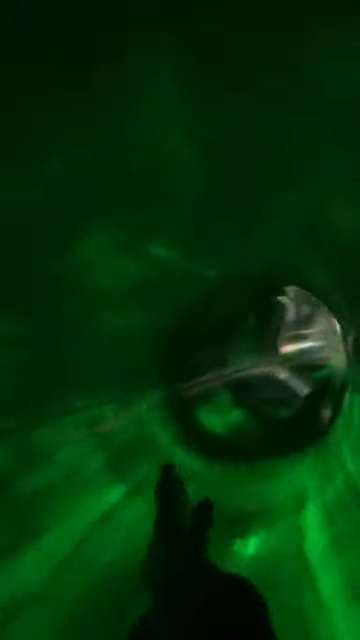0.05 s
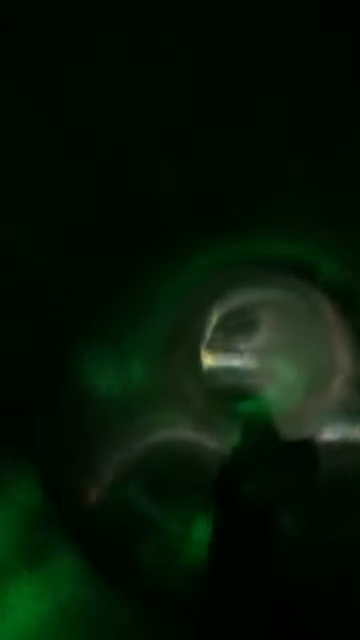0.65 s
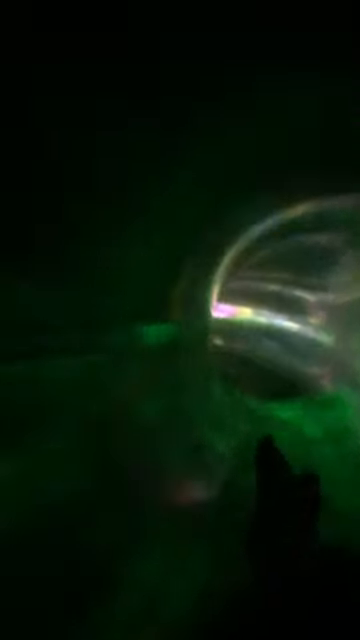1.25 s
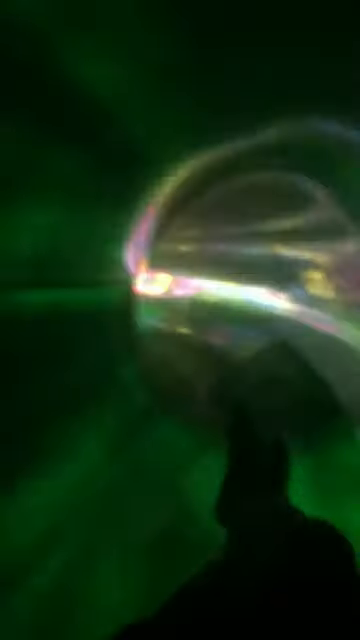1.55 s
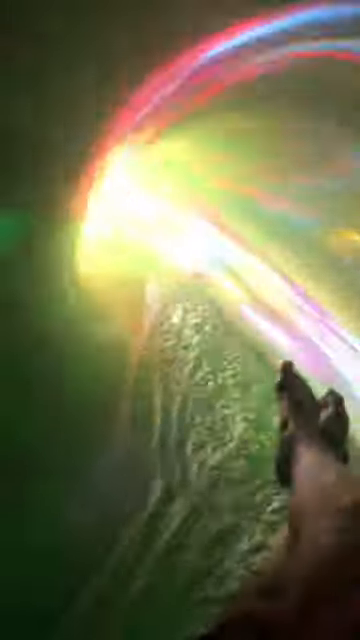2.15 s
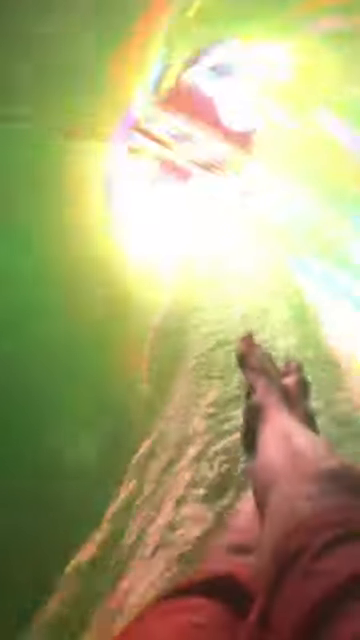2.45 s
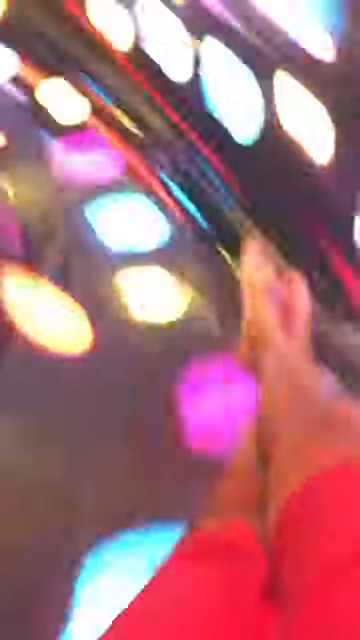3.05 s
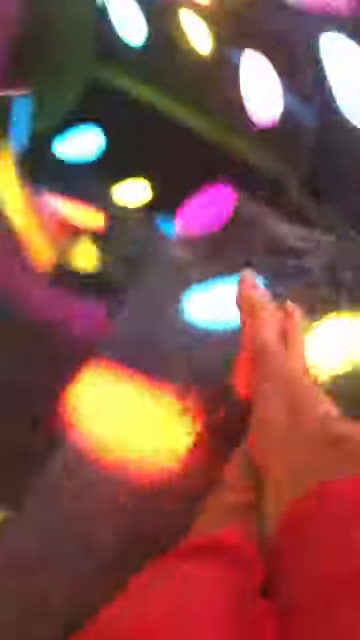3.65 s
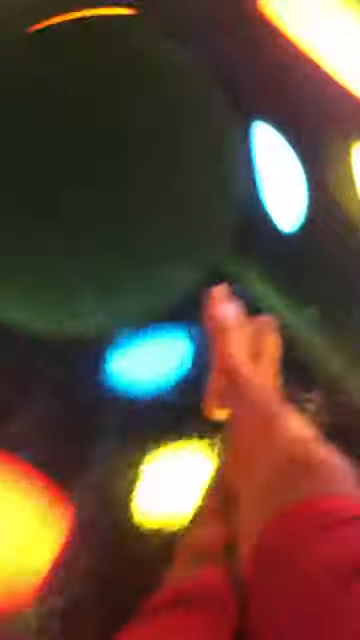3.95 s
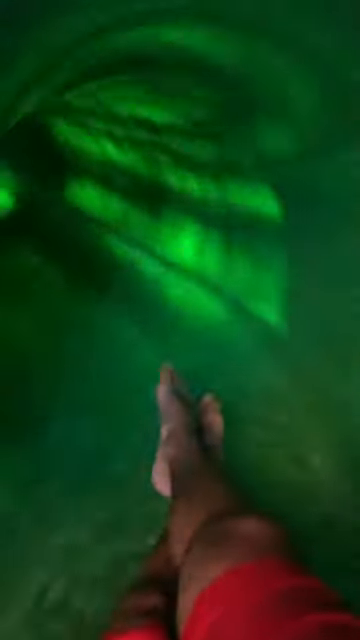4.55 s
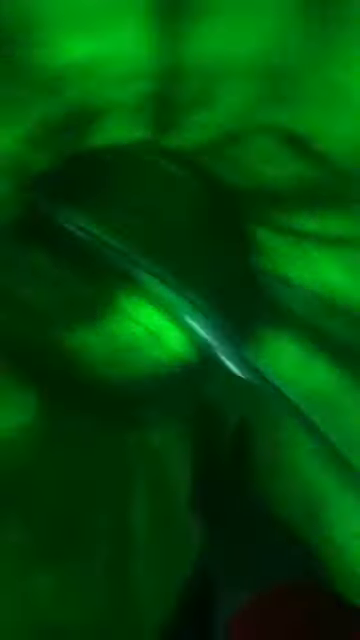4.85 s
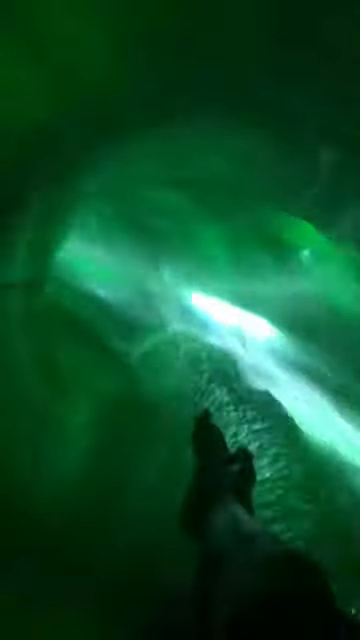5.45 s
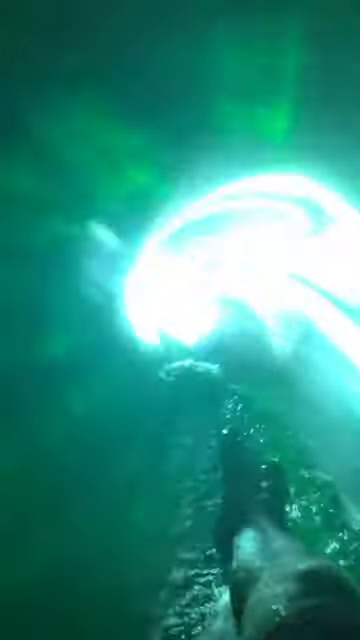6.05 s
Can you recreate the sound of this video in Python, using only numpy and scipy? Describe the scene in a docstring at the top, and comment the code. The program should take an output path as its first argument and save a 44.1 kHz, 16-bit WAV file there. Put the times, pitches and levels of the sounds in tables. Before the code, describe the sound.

From the start, water rushes and fizzes without a break under a rider sliding down an enclosed tube, heard close from a camera carried along. A fine spray hiss sits above the rush; beneath it are a hollow roar and an uneven low rumble from the tube wall. The sound builds over the first two seconds, with mild swells in the bends around 0.9, 1.5, 2 and 2.5 seconds. A faint low hum of the tube is fullest near 3 seconds. Stronger, brighter swells come at about 3.4, 4.2, 5.2 and 6.2 seconds. Soft, dull thuds jolt the camera between 2.7 and 3 seconds, at 3.7, between 4.5 and 4.8, and near 5.6 and 6. A few tiny drops tick on the housing in the same stretch, most clearly at 4.7 seconds. The water is still rushing at the end, a little after 6 seconds.

```python
"""Water rushes and fizzes under a rider who slides down an enclosed tube, holding a camera. Foam and bubbles
make the rush, finer spray hisses above it, the tube hums in its air modes and its wall rumbles under the
sliding weight; all grow with speed and swell in each bend. Bumps jolt the camera with dull thuds, some opened
by a sharp tick, and a few drops of spray tick on its housing."""
import sys
import numpy as np
from scipy import signal
from scipy.fft import rfft, irfft, next_fast_len
from scipy.io import wavfile
from scipy.ndimage import uniform_filter1d, map_coordinates

SR = 44100
rng = np.random.default_rng(int(sys.argv[2]) if len(sys.argv) > 2 else 0)


def int16_out(signal):
    """Quantize to a 16-bit WAV file."""
    q = np.round(np.clip(np.atleast_2d(signal).T, -1, 1) * 32767)
    wavfile.write(sys.argv[1], SR, q.astype(np.int16))


N = 277830

# low air modes across the tube: (frequency [Hz], width [Hz], gain re plain noise [dB])
LOW_AIR_MODES = [(237.4, 6.6, -7), (494.7, 20.5, 3), (763, 28, 5)]
# body drag and wall judder: (frequency [Hz], relative density [dB])
DRAG_SPECTRUM = [(60, -14), (140, 0), (190, 0), (260, -3), (340, -4.5), (430, -5), (600, -31), (1200, -46)]


def amp(db):
    """Decibels to gain."""
    return 10 ** (np.asarray(db) / 20)


def unit(x):
    """x at rms 1."""
    return x / np.sqrt(np.mean(x ** 2) + 1e-20)


def since(time_s):
    """Seconds since time_s, zero before it."""
    return np.maximum(np.arange(N) / SR - time_s, 0)


def swell(peak_s, rise_s, fall_s):
    """Bell in time, height 1; rise and fall to 1/e."""
    t = np.arange(N) / SR - peak_s
    return np.exp(-(t / np.where(t < 0, rise_s, fall_s)) ** 2)


def wobble(rate_hz):
    """Smooth random curve, rate_hz knots a second."""
    return map_coordinates(rng.standard_normal(1024), [np.arange(N) * rate_hz / SR], mode="wrap")


def along(points, hz):
    """Gain at hz from (Hz, dB) points on a log axis."""
    point_hz, db = np.transpose(points)
    return amp(np.interp(np.log(hz + 1), np.log(point_hz), db))


def band(hz, centre_hz, half_width_oct):
    """Bell in log frequency, height 1."""
    return np.exp(-(np.log2((hz + 1) / centre_hz) / half_width_oct) ** 2)


def filtered(x, response):
    """x through a frequency response."""
    size = next_fast_len(N + SR // 2)
    return irfft(rfft(x, size) * response(np.fft.rfftfreq(size, 1 / SR)), size)[:N]


def coloured(x, points):
    """x through a spectrum of (Hz, dB) points, at rms 1."""
    return unit(filtered(x, lambda hz: along(points, hz)))


def resonant(x, modes):
    """x plus the ringing of its modes."""
    return filtered(x, lambda hz: 1 + sum(
        amp(db) * 1j * hz * width_hz / (mode_hz ** 2 - hz ** 2 + 1j * hz * width_hz)
        for mode_hz, width_hz, db in modes))


def shelf(x, edge_hz, db):
    """High shelf with time-varying gain."""
    return x + (amp(db) - 1) * filtered(x, lambda hz: hz ** 6 / (hz ** 6 + edge_hz ** 6))


def turbulence(patchy_db):
    """Noise at rms 1, its level patchy in time and frequency."""
    spectra = signal.stft(rng.standard_normal(N), nperseg=512)[2]
    patches = uniform_filter1d(rng.standard_normal(spectra.shape), size=8, axis=0)
    patches = unit(uniform_filter1d(patches, size=12, axis=1))
    return unit(signal.istft(spectra * amp(patchy_db * patches), nperseg=512)[1][:N])


def bubbles(count, centre_hz, log_spread, decay_cycles, size_db, rise):
    """Damped rings at rms 1; each rises in pitch as its bubble nears the surface."""
    start = rng.integers(0, N, (count, 1))
    hz = np.clip(centre_hz * np.exp(log_spread * rng.standard_normal((count, 1))), 300, SR / 3)
    size = amp(size_db * np.minimum(rng.exponential(size=(count, 1)), 4))
    samples = np.arange(int(3 * decay_cycles * SR / centre_hz))
    cycles = hz * samples / SR
    age = cycles / decay_cycles
    glide = 1 + rise * np.minimum(age, 2) / 2
    rings = size * np.sin(2 * np.pi * cycles * glide) * np.exp(-2 * age)
    return unit(np.bincount((start + samples).ravel(), rings.ravel(), N)[:N])


def run_up(growth_db, settle_s=1.63):
    """Level [dB] as the rider gathers speed: from -growth_db towards 0."""
    return -growth_db * np.exp(-since(0) / settle_s)


def bends():
    """Bends press the body into the water: lift [dB] of spray and roar."""
    # (apex [s], way in [s], way out [s], spray lift [dB], roar lift [dB])
    turns = [(.92, .25, .2, 0.5, 3), (1.48, 0.17, 0.12, 0.5, 5), (1.99, 0.28, .07, .5, 4.5),
             (2.48, 0.35, 0.28, 1, 4), (3.35, .1, 0.22, 3.5, 4.5), (4.21, 0.31, 0.34, 3.5, 6.5),
             (5.2, 0.16, 0.35, 4.5, 8), (6.23, 0.27, 0.21, 6, 6.3)]
    return sum(np.outer(lifts_db, swell(apex_s, in_s, out_s)) for apex_s, in_s, out_s, *lifts_db in turns)


def leans():
    """The weight leans on the wall or lifts off it: change [dB] of rumble and drag."""
    # (time [s], half length [s], rumble change [dB], drag change [dB])
    shifts = [(0.267, 0.25, 6, 1), (0.78, 0.032, 6.5, -3), (0.915, .05, -3, 6), (1.42, .2, 3.5, -3),
              (2.405, 0.027, 7, 1), (2.85, 0.22, 3.5, -6), (3.37, 0.028, 12.5, -12), (3.494, .07, 6, -5),
              (3.813, .12, 5, 2.5), (4.344, 0.095, 9.5, 3), (4.596, 0.13, 5.5, 2), (5.158, 0.063, 6.5, -2),
              (5.41, 0.018, 9, 0), (5.82, 0.12, -5, 0.5), (6.138, 0.11, 0.5, 4)]
    return sum(np.outer(db, swell(time_s, half_s, half_s)) for time_s, half_s, *db in shifts)


def drone(level_db=-41):
    """The tube's middle stretch drones around its lowest air mode."""
    # (frequency [Hz], relative density [dB])
    spectrum = [(150, -23), (215, 7.5), (240, 1.5), (295, 8), (350, 0), (420, -8), (600, -39)]
    hum = coloured(resonant(rng.standard_normal(N), LOW_AIR_MODES), spectrum)
    return amp(level_db) * swell(peak_s=2.92, rise_s=1.4, fall_s=1.4) * hum


def body_drag(lean_db, base_db=-38):
    """The dragging body excites the low air modes."""
    drag = coloured(resonant(turbulence(patchy_db=2.5), LOW_AIR_MODES), DRAG_SPECTRUM)
    return amp(base_db + run_up(growth_db=2.5) + lean_db) * drag


def wall_rumble(bend_db, lean_db, base_db=-33):
    """The wall rumbles in buffets under the sliding weight."""
    # (frequency [Hz], relative density [dB])
    spectrum = [(15, -48), (28, -20), (40, -8.5), (54, -4.5), (66, 1.5), (88, 0.5), (110, -7.5), (145, -17),
                (220, -29.5), (500, -72)]
    buffets = unit(coloured(rng.standard_normal(N), spectrum) * amp(2.1 * wobble(28)))
    return amp(base_db + run_up(growth_db=1.5) + 0.57 * bend_db + lean_db) * buffets


def hollow_roar(bend_db, base_db=-34):
    """The enclosed air turns the rush into a hollow roar."""
    # (frequency [Hz], relative density [dB])
    spectrum = [(150, -25.5), (330, -11), (440, -4), (560, 3), (680, -0.5), (850, -3), (1100, -1),
                (1800, -40)]
    roar = coloured(resonant(turbulence(patchy_db=2.0), LOW_AIR_MODES), spectrum)
    return amp(base_db + run_up(growth_db=0.8) + bend_db + 1.1 * wobble(16)) * roar


def sharp_ticks(spatter_db=-14):
    """Sharp ticks, each breaking up in a short spatter at its own pitch: most are drops ticking on the housing,
    while those at 2.748, 4.701 and 6.018 s are the sharp fronts that open a bump's knock."""
    # (time [s], level before filtering [dB], spatter T60 [s], centre [Hz], half width [oct])
    hits = [(2.748, -22.5, .035, 8000, 3), (2.845, -27, .05, 10500, .3), (3.312, -25, .07, 14000, .22),
            (3.592, -27, .012, 6300, .4), (3.772, -21, .04, 14500, .2), (4.039, -24, .008, 13500, .9),
            (4.426, -23, .005, 9000, 1.5), (4.701, -9, .003, 9500, 1.6), (5.095, -26, .005, 9000, 1.5),
            (6.0182, -17, .005, 7000, 1)]
    # colour of all ticks: (frequency [Hz], relative gain [dB])
    colour = [(1500, -40), (4500, -16), (6500, 0), (9000, 1.5), (12000, -13), (15000, -4)]
    ticks = np.zeros(N)
    for time_s, db, t60_s, centre_hz, half_width_oct in hits:
        t = since(time_s)
        drop = (t > 0) * amp(spatter_db - 60 * t / t60_s) * rng.standard_normal(N)
        drop[round(time_s * SR)] += 1  # impact
        ticks += amp(db) * filtered(drop, lambda hz: band(hz, centre_hz, half_width_oct))
    return filtered(ticks, lambda hz: along(colour, hz) / along(colour, hz).mean())


def bumps(low_hz=52, rolloff_order=3.65, judder_t60_s=0.14):
    """High bending waves outrun low ones: each thud falls in pitch, and the wall judders on."""
    # (time [s], peak [dB], lag at 100 Hz [s], upper edge [Hz], judder re peak [dB])
    jolts = [(2.722, -20, 0.052, 200, -12), (2.736, -14.5, 0.035, 70, -9), (2.915, -20, 0.044, 240, -10),
             (2.944, -16, .02, 65, -13), (2.978, -15, 0.013, 60, -13), (3.708, -11, 0.035, 125, -14),
             (4.522, -16.5, 0.037, 120, -22), (4.692, -12.5, 0.032, 150, -16),
             (4.821, -16.5, 0.025, 80, -27), (5.595, -5.5, .037, 75.4, -16), (5.652, -10.5, 0.022, 55, -22),
             (6.016, -10.5, 0.01, 850, -17)]
    out = np.zeros(N)
    hz = np.fft.rfftfreq(SR // 4, 1 / SR)
    judder = coloured(rng.standard_normal(N), DRAG_SPECTRUM)
    for time_s, peak_db, lag_s, edge_hz, judder_db in jolts:
        passband = hz ** 4 / (hz ** 4 + low_hz ** 4) / (1 + (hz / edge_hz) ** rolloff_order)
        dispersion = np.exp(-4j * np.pi * lag_s * np.sqrt(100 * hz))
        wall_ripple = amp(4.2 * map_coordinates(rng.standard_normal(64), [hz / 45], mode="wrap"))
        thud = irfft(passband * wall_ripple * dispersion)
        slot = out[round(time_s * SR):][:len(thud)]
        slot += amp(peak_db) * thud[:len(slot)] / np.abs(signal.hilbert(thud)).max()
        t = since(time_s + lag_s / 2)
        attack = np.minimum(2 * t / lag_s, 1)
        out += amp(peak_db + judder_db - 60 * t / judder_t60_s) * attack * judder
    return out


def spray(bend_db, base_db=-42.5):
    """Fine spray thrown off the sheet of water hisses."""
    # (frequency [Hz], relative density [dB])
    spectrum = [(1500, -19.5), (3800, 3.5), (5200, -2.5), (6300, -0.5), (7900, -9.5), (9500, -11.5),
                (10700, -18.5), (12100, -35), (13400, -20), (14900, -19), (15700, -21)]
    level_db = base_db + run_up(growth_db=2.5) + bend_db + 0.5 * wobble(30)
    fizz = bubbles(count=4000, centre_hz=7000, log_spread=0.56, decay_cycles=3, size_db=4.5, rise=0.085)
    mist = coloured(turbulence(patchy_db=1.06) + amp(-12.5) * fizz, spectrum)
    # the finest droplets fly in fits, need speed and swell less in bends
    finest_db = 0.76 * wobble(14) - 4.2 * np.exp(-(since(0) / 0.7) ** 2)
    finest_db -= 0.25 * (bend_db - bend_db.mean())
    return shelf(amp(level_db) * mist, edge_hz=7100, db=finest_db)


def surging(rush, half_width_oct=0.53):
    """Water piles up against the body, briefly lifting one band of the rush."""
    # (time [s], lift [dB], half length [s], centre [Hz])
    surges = [(0.103, 1.5, .09, 1700), (1.225, 5, .028, 1900), (1.437, 2.5, 0.023, 1450),
              (1.89, 3.5, .055, 1400), (2.13, 1.5, 0.056, 1700), (2.548, 2.2, .06, 2600),
              (3.412, 6, 0.013, 2600), (3.498, 1.5, 0.072, 1400), (4.03, 1.8, .07, 1700),
              (4.652, 3.5, .012, 2000), (4.772, 6.5, 0.024, 1480), (5.015, 3, .014, 1790),
              (5.198, 2.5, .07, 2600), (6.137, 1.5, 0.09, 1350)]
    out = rush.copy()
    for time_s, lift_db, half_s, centre_hz in surges:
        gain = amp(lift_db * swell(time_s, half_s, half_s))
        out += (gain - 1) * filtered(rush, lambda hz: band(hz, centre_hz, half_width_oct))
    return out


def water_rush(bend_db, base_db=-22.5):
    """The body ploughs the sheet of water into bubbling foam, louder and brighter in bends."""
    # (frequency [Hz], relative density [dB])
    spectrum = [(250, -28), (700, -10.5), (950, -9.5), (1200, -3.5), (1450, -1.73), (1880, -0.03),
                (2150, -3.5), (2520, -6.5), (3000, -5), (3400, -10), (3900, -19.5), (5000, -30),
                (8000, -47)]
    # (frequency [Hz], width [Hz], gain re plain foam [dB])
    high_air_modes = [(1230, 70, -8.5), (1402, 49, -9), (1770, 50, -11)]
    level_db = base_db + run_up(growth_db=4) + 0.62 * bend_db + 0.29 * wobble(16)
    fizz = bubbles(count=5000, centre_hz=1889, log_spread=0.437, decay_cycles=7.5, size_db=-1, rise=0.07)
    gurgle = bubbles(count=1200, centre_hz=1703, log_spread=0.4, decay_cycles=44.8,
                     size_db=1.1, rise=0.0427)
    foam = turbulence(patchy_db=0.72) + amp(-13) * fizz + amp(-14.5) * gurgle
    rush = amp(level_db) * surging(coloured(resonant(foam, high_air_modes), spectrum))
    return shelf(rush, edge_hz=5500, db=0.6 * (bend_db - bend_db.mean()))


def scene():
    """All sources at one microphone that travels with the rider."""
    bend_db, bend_roar_db = bends()
    lean_rumble_db, lean_drag_db = leans()
    tube = drone() + body_drag(lean_drag_db) + wall_rumble(bend_db, lean_rumble_db)
    tube += hollow_roar(bend_roar_db)
    return (tube + sharp_ticks() + bumps() + spray(bend_db) + water_rush(bend_db))[None]


def record(dry, top_hz=15720):
    """The camera keeps nothing above its band limit."""
    return filtered(dry[0], lambda hz: hz < top_hz)[None]


dry = scene()
out = record(dry)
int16_out(out)
```